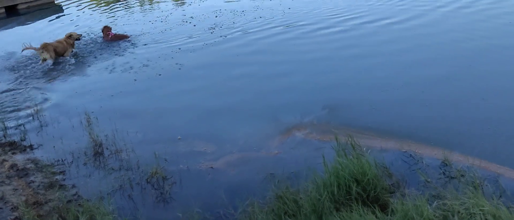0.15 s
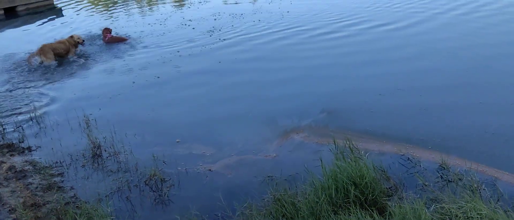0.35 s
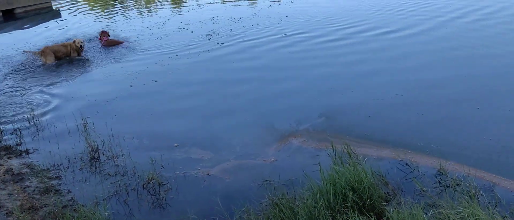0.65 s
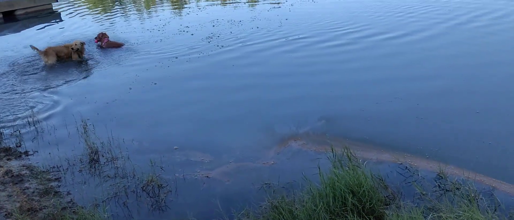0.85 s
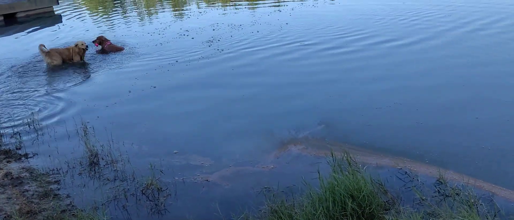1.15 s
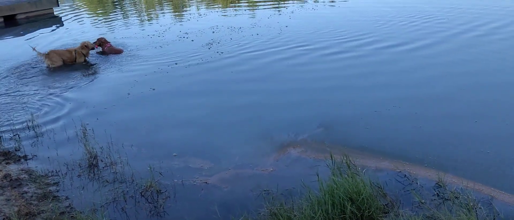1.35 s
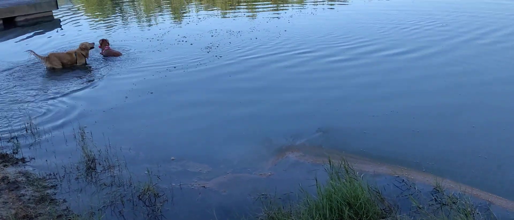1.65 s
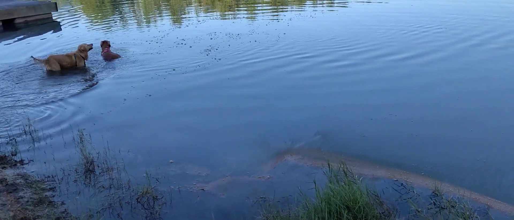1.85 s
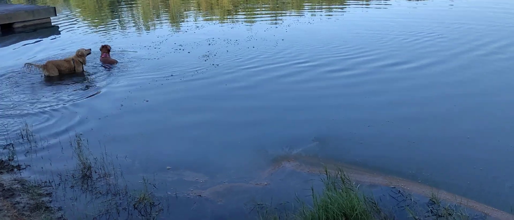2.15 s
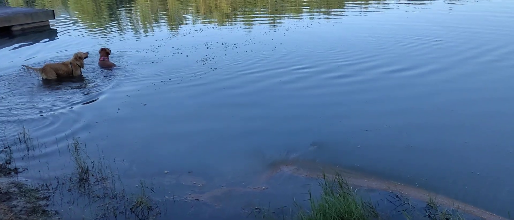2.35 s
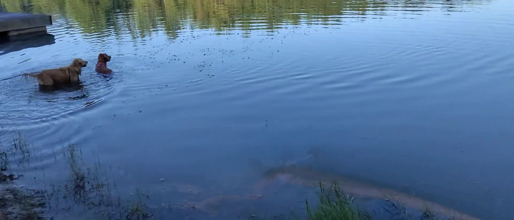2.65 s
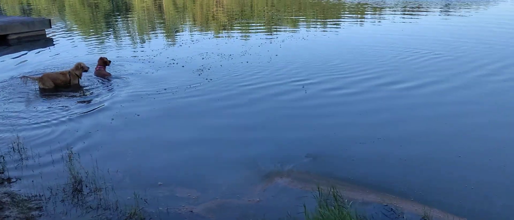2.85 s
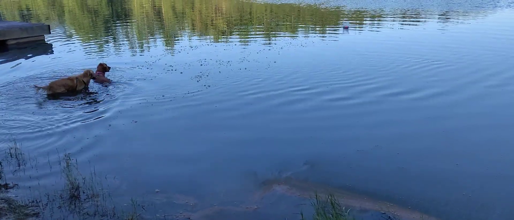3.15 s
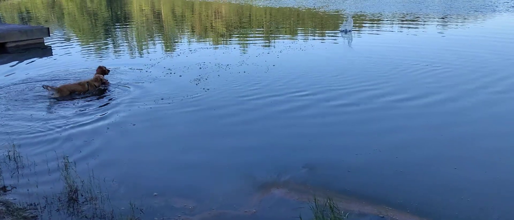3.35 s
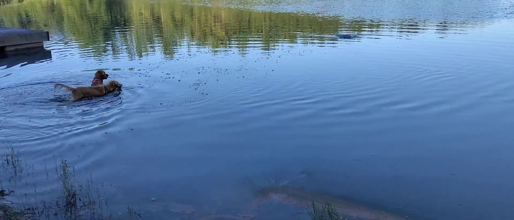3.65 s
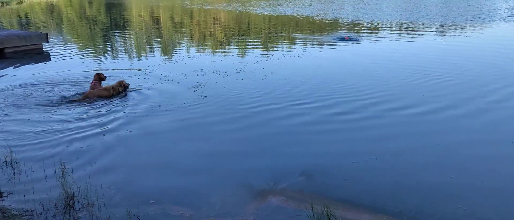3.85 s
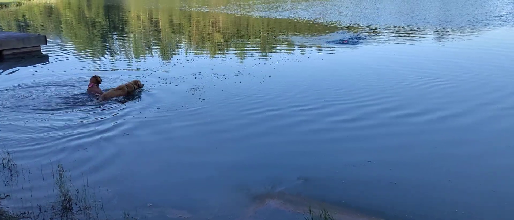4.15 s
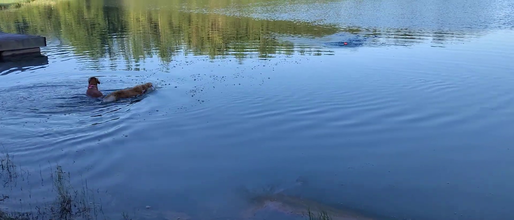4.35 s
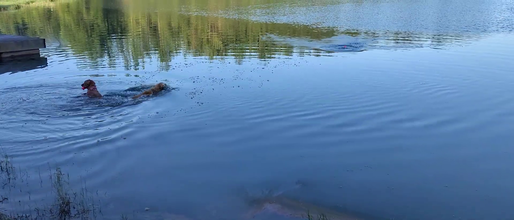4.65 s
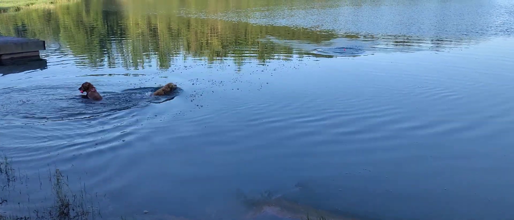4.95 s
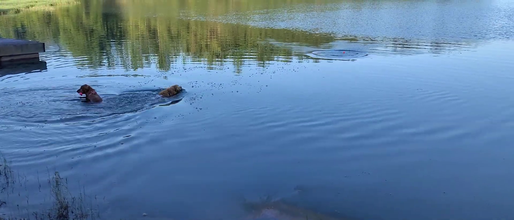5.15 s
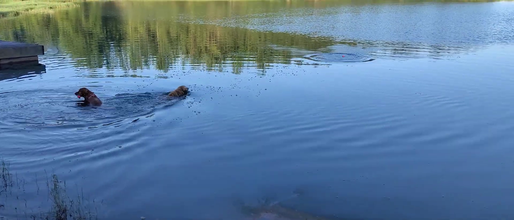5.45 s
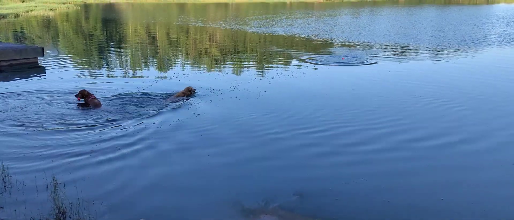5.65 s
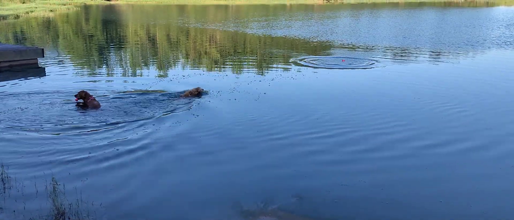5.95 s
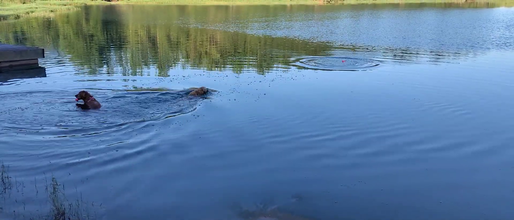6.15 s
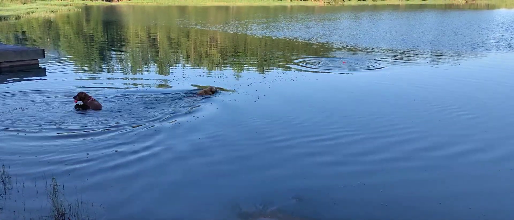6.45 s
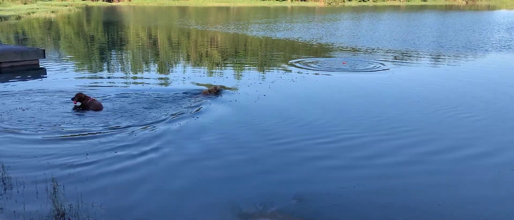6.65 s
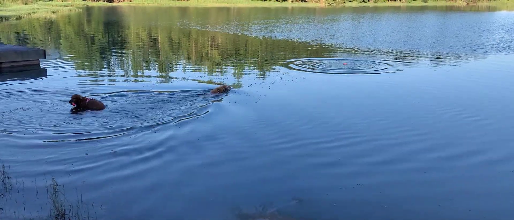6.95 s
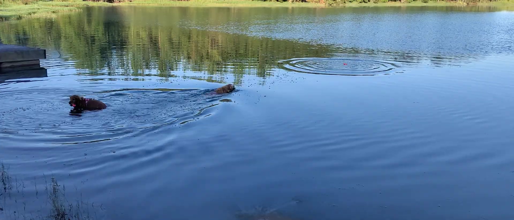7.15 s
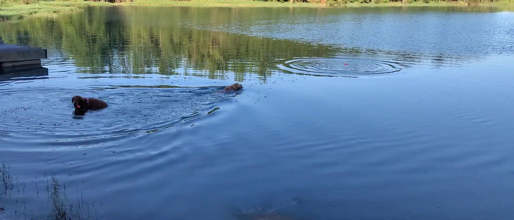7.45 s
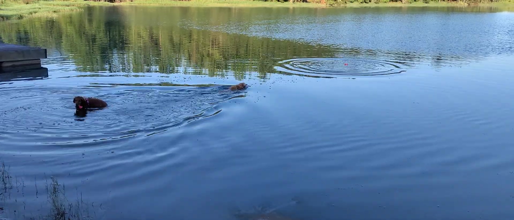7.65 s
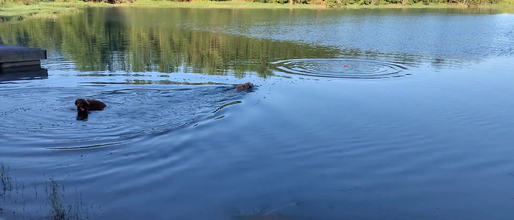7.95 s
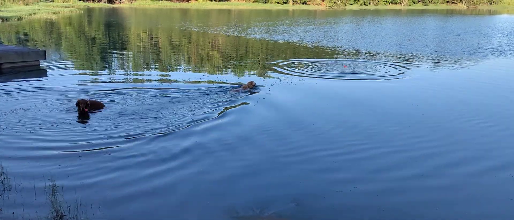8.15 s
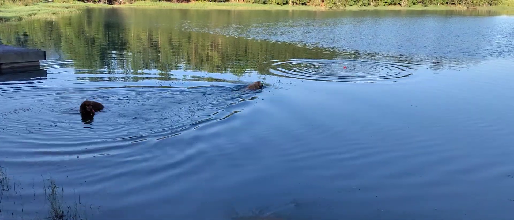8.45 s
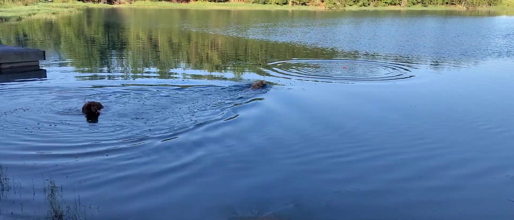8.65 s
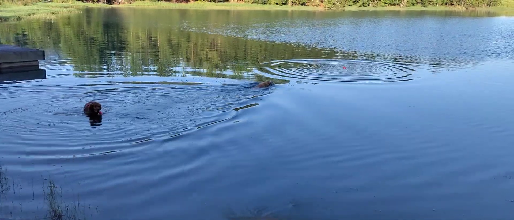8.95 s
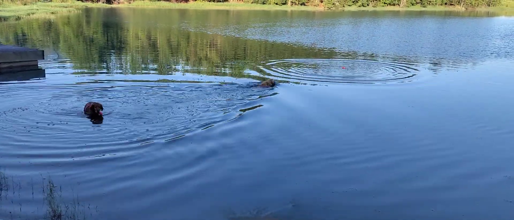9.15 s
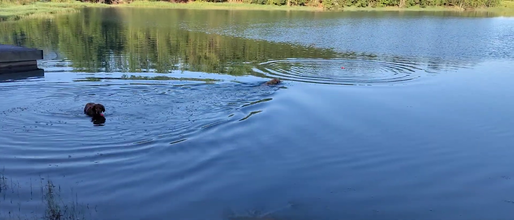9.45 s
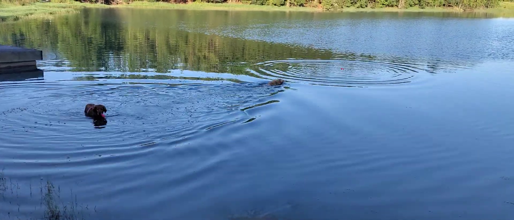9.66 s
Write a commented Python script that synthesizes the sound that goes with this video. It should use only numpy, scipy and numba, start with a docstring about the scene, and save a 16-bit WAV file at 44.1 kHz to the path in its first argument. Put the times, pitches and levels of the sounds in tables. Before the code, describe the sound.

Close wet splashing and low gurgles open the scene, thinning into scattered drips and faint ringing water tones. After a tiny falling dog whine comes a crisp slap on the water, then a second burst of churning, plops and one bright rising chirp. A bubbling snort ends the burst; later there is sparse lapping, another hissy snort and dry twig cracks. Open pond with trees, handheld stereo, light wind puffs, distant hum.

```python
"""A still pond with a wooded shore: a dog wades, then swims, metres left of a phone on the bank; a thrown toy smacks the water.
Bubbles of five sizes churn, ringing grains plop and chirp, faint random tones swell, the dog squeaks once and snorts wetly.
Stems snap as short rings with a crack; the trees smear the near sounds back as decaying noise.
Shaped noise makes puffs of wind on the microphones, throbbing insects and drones, a far hum and far air."""
import sys
import numpy as np
from scipy import signal
from scipy.fft import rfft, irfft, next_fast_len
from scipy.io import wavfile
from scipy.ndimage import uniform_filter1d
from numba import njit

SR = 44100
rng = np.random.default_rng(int(sys.argv[2]) if len(sys.argv) > 2 else 0)


def int16_out(signal):
    """Quantize to a 16-bit WAV file."""
    q = np.round(np.clip(np.atleast_2d(signal).T, -1, 1) * 32767)
    wavfile.write(sys.argv[1], SR, q.astype(np.int16))


N = 432621
T = np.arange(N) / SR
OPPOSED = np.array([[1], [-1]])  # left and right in antiphase

# Bubble sizes. Each row: lowest pitch in Hz, highest pitch in Hz, most per second, ring scale in cycles.
BUBBLE_SIZES = [(550, 1100, 340, 11), (170, 500, 100, 7), (1100, 2000, 520, 13), (2000, 6000, 1500, 18),
                (6800, 15500, 3500, 5)]


def undb(db):
    """Turn dB into an amplitude factor."""
    return 10 ** (np.asarray(db) / 20)


def level(x, db):
    """Scale to an RMS level in dB."""
    return x * undb(db) / np.sqrt(np.mean(x ** 2))


def noise():
    """White Gaussian noise."""
    return rng.standard_normal(N)


def band(x, lo_hz, hi_hz):
    """Third-order Butterworth bandpass."""
    return signal.sosfilt(signal.butter(3, [lo_hz, hi_hz], "bandpass", fs=SR, output="sos"), x)


def colour(x, table, share=1, late=None):
    """Shape a spectrum by (Hz, dB) points times share, and hold it back by (Hz, radians) points."""
    size = next_fast_len(N)
    hz = np.arange(size // 2 + 1) * SR / size
    point_hz, point_db = np.transpose(table)
    db = np.interp(np.log(hz + 1), np.log(point_hz), point_db)
    turn = np.interp(hz, *np.transpose(late)) if late else 0
    return irfft(rfft(x, size) * undb(share * db) * np.exp(-1j * turn), size)[:N]


def play(table):
    """Columns interpolated over time, and a smoothed gate that is open while the table lasts."""
    s, *columns = np.transpose(table)
    gate = (T >= s[0]) & (T <= s[-1])
    return uniform_filter1d(1. * gate, 600), [np.interp(T, s, c) for c in columns]


def pan(x, db):
    """Two ports that differ by so many dB, left minus right."""
    return x * undb([[db / 2], [-db / 2]])


def walk(rate_hz):
    """Random levels held 1 / rate_hz s and slewed twice; spread near 1."""
    k = int(SR / rate_hz)
    steps = np.repeat(rng.standard_normal(N // k + 1), k)
    return 1.3 * uniform_filter1d(uniform_filter1d(steps, k), k)[:N]


def burst(s, db, rise_s, hold_s, t60_s):
    """Summed gain of events that rise as a square, hold and fade exponentially."""
    out = np.zeros(N)
    for at, top, up, flat, fade in np.broadcast(s, db, rise_s, hold_s, t60_s):
        i = int(max(at, 0) * SR)
        t = T[:min(N - i, int((up + flat + fade) * SR))]
        attack = np.minimum(t / up, 1) ** 2
        out[i:i + len(t)] += undb(top) * attack * 1000. ** -(np.maximum(t - up - flat, 0) / fade)
    return out


@njit
def ring(length, start, hz, t60, rise, size, soft):
    """Dying sine grains that swell in over `soft` cycles and rise `rise` octaves within a third of their t60."""
    out = np.zeros(length)
    for g in range(len(start)):
        w, a, phase = 2 * np.pi * hz[g] / SR, size[g], 0.
        n = int(t60[g] * SR)
        fade, glide = 1000 ** (-1 / n), 2 ** (3 * rise[g] / n)
        for i in range(int(start[g]), min(int(start[g]) + n, length)):
            out[i] += a * np.sin(phase) * (1 - np.exp(-phase / (2 * np.pi * soft)))
            phase, a, w = phase + w, a * fade, min(w * glide, 2.8)  # w stays below Nyquist
    return out


def bubbles(lo_hz, hi_hz, per_s, cycles, busy, scatter_db):
    """A swarm of rising bubbles, a few much bigger; calm water gives fewer that ring longer."""
    biggest_db = 8  # cap over the smallest
    when, pitch, glide, big, thin = rng.random((int(per_s * N / SR), 5)).T
    hz = lo_hz * (hi_hz / lo_hz) ** pitch
    share = busy[(when * N).astype(int)]
    size = undb(np.minimum(-scatter_db * np.log(1 - big), biggest_db))
    size = size * np.clip(8 * (share - 0.872 * thin), 0, 1)
    t60_s = 2 * cycles * (0.9 + glide) / hz / share
    return ring(N, when * N, hz, t60_s, 0.284 * glide, size, 0.56)


def churn():
    """Each bubble size follows the stir and the splashes; they come in patches over a smooth rush."""
    # How hard the water is stirred. Each row: time in seconds, bubbles in dB, brightness in dB.
    stir = [(0, -43, 3), (.2, -51.5, 6.5), (.35, -44.5, 0), (.5, -45.5, 0.5), (.68, -50.5, 2),
            (.83, -60, 2.5), (1.06, -74, 12), (1.35, -67, 6), (1.9, -88, 12), (2.04, -84, 21),
            (2.09, -68, 14), (2.2, -81.5, 9), (2.5, -79.5, 8.5), (2.8, -86.5, 11), (3.25, -82.5, 8),
            (3.33, -52, 4.5), (3.5, -57.5, 2.5), (3.68, -46, 3), (3.8, -53.5, 5.5), (4.05, -47.5, 1),
            (4.22, -53.5, 4.5), (4.33, -40, -2), (4.52, -44, 2), (4.88, -48.5, 1), (5.05, -57.5, 3),
            (5.22, -59.5, 6.5), (5.27, -70.5, 4.5), (5.38, -68.5, 7), (5.9, -70, 6), (6.3, -81.5, 11),
            (6.7, -94, 14.5), (7.1, -78.5, 12.5), (7.4, -67.5, -0.5), (7.7, -87.5, 13.5), (8.1, -90, 11.5),
            (8.4, -61.5, -18), (8.72, -75, -1), (9.17, -73, -1.5), (9.35, -86, 9.5), (9.81, -82, 5)]
    # Single splashes. Each row: start in seconds, bubbles in dB, brightness in dB, fade t60 in seconds.
    splashes = [(.165, -40, -2, 0.47), (.19, -38.5, -1.5, 1), (0.388, -39, -0.5, 0.11),
                (.79, -59.5, 4, 0.39), (.87, -60, 5.5, 0.27), (1.027, -65.5, 8, 0.31),
                (2.15, -67, -10, 0.093), (2.539, -79, 17, 0.36), (3.27, -37, 9.5, 0.085),
                (3.598, -45, -22, 0.039), (3.781, -61, 10.5, 0.22), (3.905, -46, -4, 0.99),
                (4.09, -54, -5, 0.096), (4.269, -42, -6.5, 0.56), (4.434, -33, -0.5, 0.042),
                (5.034, -53.5, 2, 0.23), (5.126, -53, 0.5, 0.62), (5.361, -65, 4.5, 0.33),
                (6.12, -60, -9, 0.6), (6.398, -78, 17, 0.3), (6.541, -60, 0, 0.52), (6.87, -85, 17.5, 0.29),
                (7.07, -69.5, 6, 0.4), (7.3, -60.5, -9, 0.35), (7.86, -69, -2, 0.31),
                (8.991, -64.5, -27, 0.4)]
    # Low gurgles and rumbles, those near 5.5 s under the snort.
    # Each row: start in seconds, level in dB, hold in seconds, fade t60 in seconds.
    gurgles = [(0, -46.5, 0.021, 0.22), (0.057, -42.5, 0.14, 0.41), (0.314, -49.5, 0.11, 0.58),
               (0.514, -42, 0.099, 0.4), (2.08, -72, 0.04, 0.63), (3.269, -51.5, 0.016, 0.2),
               (4.298, -63, 0.045, 0.24), (4.446, -52.5, 0.048, 0.84), (5.429, -50, 0.03, .2),
               (5.57, -45, 0.068, 0.4), (5.7, -53, 0.074, 0.28)]
    # Each row, per bubble size: offset in dB, dB gained per dB of brightness, smooth rush in dB, port spread in dB.
    size_mix = [(-0.5, 0, -6.5, -18), (0, 0, -9, -17.5), (-2.5, 0.68, -17.5, -9), (-10, 1.5, -6, -4.5),
                (-12.5, 1.72, -3, -2)]
    # Water spectrum, rippled by the bounce off the pond. Each row: frequency in Hz, shape in dB.
    water_shape = [(150, -17), (360, -16.5), (490, -9.5), (810, 10.5), (1110, -2.5), (1450, 3), (1850, 2),
                   (2030, -14), (2150, -17.5), (2330, -11.5), (2570, -13), (2900, -16), (3290, -8.5),
                   (3550, -13.5), (3780, -7.5), (4100, -12), (4380, -11.5), (4650, -12.5), (4890, -8.5),
                   (5150, -13.5), (5400, -9.5), (5800, -11.5), (6350, -31.5), (7200, -26.5), (11000, -40),
                   (15500, -36)]
    splash_rise_s, gurgle_rise_s, calm_gurgle_db, pan_db = 0.0076, 0.014, -28, -4

    _, (db, bright) = play(stir)
    s, top, shine, t60_s = np.transpose(splashes)
    gains = []
    for up, k, *_ in size_mix:
        splash = burst(s, top + up + k * shine, splash_rise_s, 0, t60_s)
        gains.append(np.hypot(undb(db + up + k * bright), splash))
    at, gurgle_db, hold_s, fade_s = np.transpose(gurgles)
    gurgle = burst(at, gurgle_db, gurgle_rise_s, hold_s, fade_s)
    gains[1] = np.hypot(gains[0] * undb(calm_gurgle_db), gurgle)  # the lowest bubbles
    ticks = spatter()
    gains[3], gains[4] = gains[3] * ticks ** 0.2, gains[4] * ticks ** 0.4

    out, patch = 0, walk(22)
    busy = np.clip(np.sqrt(gains[0] * undb(55.5)), .3, 1)
    for (lo, hi, per_s, cycles), gain, (*_, rush_db, wide_db) in zip(BUBBLE_SIZES, gains, size_mix):
        swarm = level(bubbles(lo, hi, per_s, cycles, busy, scatter_db=2.5), 0)
        rush = undb(rush_db) * level(band(noise(), lo, hi), 0)
        mix = band(colour(swarm + rush, water_shape), lo, hi) * undb(0.84 * patch + 2.3 * walk(30))
        wide = undb(wide_db) * np.roll(mix, SR // 3) * OPPOSED  # other bubbles off to either side
        out = out + level(mix + wide, 0) * gain
    return pan(0.94 * out, pan_db)


def spatter():
    """Gain that jumps as flung drops land and dies away in a moment."""
    per_s, t60_s, scatter_db = 50, .04, 2.5
    gap, big = rng.random((500, 2)).T
    s = np.cumsum(-np.log(1 - gap)) / per_s
    keep = s < T[-1]
    return level(0.5 + burst(s[keep], -scatter_db * np.log(1 - big[keep]), .002, 0.0036, t60_s), 0)


def snorts():
    """Air blown through a wet nose: the nostrils flap unevenly and bubbles burst in the blast."""
    # Each row: start in seconds, nose level in dB, rise in seconds, hold in seconds, fade t60 in seconds,
    # throat in dB re nose, brightness in dB, spray in dB re nose, high hiss in dB re nose.
    snort_rows = [(5.452, -53.5, 0.022, 0.011, 0.32, 5, 3, -2, -10),
                  (5.502, -41, 0.015, 0.065, 0.063, 3.5, 2, -15, -11.5),
                  (5.545, -53.5, 0.016, 0.013, 0.028, 2, 5, 11, -2),
                  (5.687, -51.5, 0.0046, 0.039, 0.28, 6, -6.5, -28, -32),
                  (8.083, -62, 0.047, 0.041, 0.26, -23, 17.5, -11, 2),
                  (8.162, -40.5, 0.025, 0.075, 0.32, -18.5, 0, -19, -19.5)]
    # Upper nose, then hiss. Each row: offset in dB, dB gained per dB of brightness.
    bright_mix = [(-2, 1.17), (-11, 1.5)]
    # Nose spectrum. Each row: frequency in Hz, shape in dB.
    nose_shape = [(88, -47), (150, 11), (215, -0.5), (540, -8), (800, -1), (1080, -9), (1420, -1),
                  (1950, -10), (2600, -10.5), (2980, -14), (3350, -7.5), (4500, -10.5), (6730, -24),
                  (10500, -38), (15500, -33)]
    spray_hz, pan_db = 3700, -4

    s, db, rise_s, hold_s, t60_s, throat_db, bright, spray_db, hiss_db = np.transpose(snort_rows)
    ups = [0, throat_db] + [up + k * bright for up, k in bright_mix] + [spray_db, hiss_db]
    lo, hi, per_s, cycles = BUBBLE_SIZES[3]
    split = [(lo, spray_hz, per_s / 2, cycles), (spray_hz, hi, per_s / 2, cycles)]
    sizes = BUBBLE_SIZES[:3] + split + [BUBBLE_SIZES[4]]
    out, flap = 0, undb(4.9 * walk(70))
    for (lo, hi, per_s, cycles), up in zip(sizes, ups):
        wet = level(bubbles(lo, hi, per_s, cycles, np.ones(N), scatter_db=1.0), 0)
        blast = wet + undb(-2.0) * flap * level(band(noise(), lo, hi), 0)
        gain = burst(s, db + up, rise_s, hold_s, t60_s)
        out = out + level(band(colour(blast, nose_shape), lo, hi), 0) * gain
    return pan(out, pan_db)


def plops(rows, drier_db=0):
    """One dying sine grain each; a large glide makes it swell in slowly; faint ones are wetter with echo."""
    echo_at_minus_40_db, echo_per_db = -4.5, -0.2281
    s, db, hz, t60_s, pan_db, rise = np.transpose(rows)[:, :, None]
    sounds = []
    for k in range(len(s)):
        soft_cycles = 1.5 + 60 * rise[k, 0] ** 2
        sounds.append(ring(11000, 0 * s[k], hz[k], t60_s[k], rise[k], 1.5 * undb(db[k]), soft_cycles))
    echo_db = echo_at_minus_40_db + echo_per_db * (db[:, 0] + 40) + drier_db
    return place(s[:, 0], sounds, pan_db[:, 0], echo_db)


def faint_tones():
    """Faint random tones from 650 to 3600 Hz that swell in softly and ring on, spread over both ports."""
    # Each row: time in seconds, level in dB.
    tone_levels = [(0, -70), (.9, -62.5), (1.6, -65.5), (2.6, -74), (3.3, -69), (4.5, -52.5), (5.3, -67),
                   (6.2, -71), (6.7, -74), (7.3, -76), (7.8, -73), (8.5, -71.5), (9.2, -75.5),
                   (9.81, -79.5)]
    per_s, lo_hz, hi_hz = 110, 650, 3600
    t60_scale_s, swell_cycles, tilt_db_per_octave = .1, 26., -3.5
    _, (db,) = play(tone_levels)
    layers = []
    for at, pitch, ringing, big, glide in rng.random((2, int(per_s * N / SR), 5)).transpose(0, 2, 1):
        hz = lo_hz * (hi_hz / lo_hz) ** pitch
        size = undb(-2.6 * np.log(1 - big) + tilt_db_per_octave * np.log2(hz / lo_hz))
        t60_s = t60_scale_s * (0.32 + ringing)
        layers.append(ring(N, at * N, hz, t60_s, .06 * (glide - .3), size, swell_cycles))
    mid, side = layers
    out = np.array([mid + 0.2 * side, mid - 0.3 * side]) * undb(4.4 * walk(60))
    return level(out, 0) * undb(db)


def squeak():
    """A thin falling whine of four partials over a breathy low grunt."""
    # Each row: time in seconds, pitch in Hz, partials 1 to 4 in dB.
    whine_track = [(2.02, 1025, -61, -74, -71, -72), (2.03, 1016, -53.5, -57, -51, -58),
                   (2.055, 971, -52.5, -55, -53, -55), (2.093, 933, -62.5, -56.5, -50, -65),
                   (2.106, 915, -75, -66, -77, -80)]
    # Each row: time in seconds, pitch in Hz, level in dB.
    grunt_track = [(2.04, 376, -90), (2.058, 390, -65), (2.118, 355, -67), (2.15, 360, -83)]
    gate, (hz, *dbs) = play(whine_track)
    phase = 2 * np.pi * np.cumsum(hz * (1 + 0.0055 * walk(90))) / SR
    partials = [undb(db + 3.0 * walk(120)) * np.sin((k + 1) * phase) for k, db in enumerate(dbs)]
    whine = gate * np.sqrt(2) * sum(partials)
    gate, (hz, db) = play(grunt_track)
    grunt = gate * undb(db + 4.2 * walk(41.5)) * np.sqrt(2) * np.sin(2 * np.pi * np.cumsum(hz) / SR)
    return pan(whine, -8) + undb(-4) * trees(whine) + grunt


def snaps():
    """A few cycles of a dry stem, its overtone and a short crack."""
    # Each row: start in seconds, level in dB, ring in Hz, ring t60 in seconds, left minus right in dB,
    # overtone in Hz, overtone in dB re ring, echo in dB.
    snap_rows = [(2.16, -42.5, 1960, 0.019, -12, 3800, -13, 0),
                 (2.981, -44.5, 930, 0.012, 17, 1250, -5.5, 12),
                 (6.502, -30, 1520, 0.0072, 14, 2450, 3, -2.5), (6.502, -42, 3300, .008, 5, 2960, -2, -3),
                 (7.5395, -40.5, 620, 0.0071, 12, 1090, 3, 7.5),
                 (7.5505, -37.5, 980, 0.01, 23, 1460, -12, 3), (7.5505, -40, 420, 0.0091, 25, 643, -15, -1),
                 (8.61, -40, 953, 0.0096, 16, 1386, 0, 2), (9.3888, -27, 705, 0.0055, 27, 1030, 0, 3)]
    crack_db = -9
    s, db, hz, t60_s, pan_db, over_hz, over_db, echo_db = np.transpose(snap_rows)[:, :, None]
    t = np.arange(1000) / SR
    cracks = rng.standard_normal((len(s), len(t))) * 1000 ** (-t / t60_s) * undb(db + crack_db)
    sounds = []
    for k in range(len(s)):
        stem = ring(len(t), 0 * s[k], hz[k], t60_s[k], 0 * s[k], undb(db[k]), 1.0)
        overtone = ring(len(t), 0 * s[k], over_hz[k], t60_s[k], 0 * s[k], undb(db[k] + over_db[k]), 1.0)
        lo, hi = hz[k, 0], over_hz[k, 0]
        snap = band(stem + overtone + cracks[k], 0.46 * lo, 1.8 * hi)
        sounds.append(band(snap, 0.3 * lo, 1.7 * hi))
    return place(s[:, 0], sounds, pan_db[:, 0], echo_db[:, 0])


def place(s, sounds, pan_db, echo_db):
    """Lay short sounds out in time, each with its own side and share of echo."""
    out = np.zeros((3, N + len(sounds[0])))  # left, right, echo send
    for at, x, side, echo in zip(s, sounds, pan_db, echo_db):
        i = int(at * SR)
        out[:, i:i + len(x)] += undb([[side / 2], [-side / 2], [echo]]) * x
    return out[:2, :N] + trees(out[2, :N])


def trees(x):
    """The wooded shore scatters a sound back as a short smear, different at each port."""
    t60_s, rise_s = 0.29, 0.0019
    t = np.arange(int(.35 * SR)) / SR
    back = rng.standard_normal((2, len(t))) * 1000 ** (-t / t60_s) * (1 - np.exp(-t / rise_s))
    return signal.fftconvolve(x[None], back / np.sqrt(np.sum(back ** 2) / 2), axes=1)[:, :N]


def ports(x, late=None):
    """Each port of the phone colours the pond its own way; the right may lag."""
    # Left minus right, scaled by each port's share. Each row: frequency in Hz, shape in dB.
    port_shape = [(60, 4.5), (110, -11), (200, 8), (380, 12.5), (700, 10), (1290, 8.5), (2380, -16),
                  (4400, -21), (8120, 23), (15000, -5.5)]
    left = colour(x[0], port_shape, share=0.16)
    right = colour(x[1], port_shape, share=-0.27, late=late)
    return np.array([left, right])


def wind():
    """Low rumble, partly shared by both ports: a light breeze with puffs on it."""
    # Each row: start in seconds, level in dB, hold in seconds, fade t60 in seconds, left minus right in dB.
    puff_rows = [(0, -64.5, 0.038, 0.96, 4), (0.35, -58.5, 0.043, 0.62, -4),
                 (0.496, -50.5, 0.21, 0.62, -0.5), (1.09, -68, 0.049, 0.37, 2),
                 (1.222, -51, 0.042, 0.53, -3), (1.382, -59, 0.068, 0.37, -7),
                 (3.018, -60.5, 0.024, 0.22, 0), (3.16, -52, 0.029, 0.49, -6),
                 (3.805, -39.5, 0.11, 0.25, -14), (3.969, -47.5, 0.028, 0.64, 1),
                 (4.155, -52, 0.03, 0.52, -2), (4.318, -54, 0.027, 0.25, -12), (4.45, -59, 0.18, 0.44, -3),
                 (5.524, -57.5, 0.098, 0.48, 2), (5.776, -60, 0.052, 0.95, -5),
                 (6.085, -63, 0.018, 0.17, 2), (6.517, -67, 0.23, .5, -11), (7.054, -65, 0.057, .3, -3),
                 (7.218, -57.5, 0.15, 0.16, -16), (7.706, -53.5, 0.035, 0.37, -4),
                 (8.417, -55.5, 0.022, 0.19, -6), (8.828, -61, 0.031, 0.53, -5),
                 (8.987, -65, 0.014, 0.16, 5)]
    # Rumble spectrum. Each row: frequency in Hz, shape in dB.
    rumble_shape = [(12, -66), (30, 3), (72, 14.5), (110, 11), (168, -9.5), (255, -36.5), (296, -31.5),
                    (353, -28.5), (400, -49), (520, -24.5), (880, -120)]
    rise_s, breeze_db = 0.0173, -74
    s, db, hold_s, t60_s, pan_db = np.transpose(puff_rows)
    gains = []
    for side in (1, -1):
        breeze = undb(breeze_db + 4.1 * walk(7.4))
        gains.append(np.hypot(breeze, burst(s, db + side * pan_db / 2, rise_s, hold_s, t60_s)))
    both, apart = (level(colour(noise(), rumble_shape), 0) for _ in range(2))
    return np.array(gains) * (both + 0.47 * apart * OPPOSED)


def insects_and_drones():
    """Narrow noise bands that throb apart at each port: insects and two drones that come and go."""
    # Each row: centre in Hz, width in Hz, level in dB re the insect level.
    insects = [(2995, 350, -18.5), (5044, 240, -9), (5650, 460, -11.5), (7510, 290, -6), (8550, 720, -6)]
    # Each row: time in seconds, low drone in dB, insect line in dB.
    drones = [(0, -54.5, -99), (1.06, -63, -77), (1.85, -65.5, -80.5), (2.15, -73.5, -73), (2.42, -61, -76),
              (2.65, -79, -83), (2.9, -86, -70.5), (3.3, -76, -95), (5.3, -62.5, -81), (5.65, -69, -80),
              (6, -66, -85), (6.4, -71, -71), (6.7, -102, -84.5), (7.2, -92, -76), (7.33, -92, -67.5),
              (7.5, -92, -75), (7.62, -87, -83), (7.7, -86, -77), (8.25, -68.5, -63.5), (8.45, -69, -91),
              (8.7, -71.5, -69.5), (9.05, -74.5, -97.5), (9.81, -110, -95.5)]
    # Bands of the two drones. Each row: centre in Hz, width in Hz.
    drone_bands = [(930, 128), (2880, 90)]
    # The strongest insect band. Each row: time in seconds, level in dB.
    cricket = [(0.0, -68), (0.13, -71), (0.49, -75), (0.66, -73), (1.86, -80.5), (2.05, -79.5), (2.92, -85),
               (3.28, -84), (3.44, -73), (3.79, -77), (4.18, -79), (4.51, -75), (5.85, -78.5),
               (6.42, -76.5), (7.68, -77), (8.28, -74), (8.47, -79.5), (9.29, -80.5), (9.45, -77.5),
               (9.81, -82.5)]
    # One row: centre in Hz, width in Hz.
    cricket_band = (4058, 160)
    # Left minus right of far sounds, scaled by each side's share. Each row: frequency in Hz, shape in dB.
    far_sides = [(60, 1.5), (110, -1.0), (200, -2), (380, 10), (700, -11.5), (1290, 11), (2380, -8),
                 (4400, -8), (8120, 6.5), (15000, -8.5)]
    insects_db = -74.5
    swell = [db + insects_db + 1.1 * walk(3) + 2.6 * walk(12) for _, _, db in insects]
    swell += [db + 1.9 * walk(8) for db in play(drones)[1] + play(cricket)[1]]
    bands = [row[:2] for row in insects + drone_bands + [cricket_band]]

    def one_side():
        """Every band with its own fast throb."""
        return sum(undb(db + 3.44 * walk(24)) * level(band(noise(), f - w / 2, f + w / 2), 0)
                   for (f, w), db in zip(bands, swell))

    return np.array([colour(one_side(), far_sides, share=0.53), colour(one_side(), far_sides, share=-0.62)])


def hum():
    """A far engine drone: low wavering lines of narrow noise, the same at both ports."""
    # Each row: centre in Hz, width in Hz, level in dB.
    hum_lines = [(67.7, 4.8, -67), (117.9, 2.7, -73.5), (173.3, 2.9, -81)]
    out = 0
    for hz, w, db in hum_lines:
        narrow = signal.butter(1, [hz - w / 2, hz + w / 2], "bandpass", fs=SR, output="sos")
        out = out + level(signal.sosfilt(narrow, noise()), db)
    return out


def wavering_noise():
    """Adjacent noise bands, each wavering alone, the low ones most."""
    out = 0
    for f in 25 * 1.5 ** np.arange(16):
        depth_db = np.interp(np.log(f), np.log([300, 6000]), [3.5, 1.2])
        out = out + band(noise(), f, f * 1.5) * undb(depth_db * walk(8))
    return out


def far_air():
    """Far air: wavering noise, partly shared by both ports."""
    # Each row: frequency in Hz, shape in dB.
    air_shape = [(12, -46), (20, 8.5), (59, 10), (119, -3), (144, 4.5), (175, -2), (362, -8), (581, -61),
                 (881, -13.5), (1270, -37.5), (2840, -25), (3750, -83.5), (4810, -29), (7110, -24.5),
                 (15500, -27)]
    mid, side = wavering_noise(), wavering_noise()
    return level(np.array([colour(mid + 0.3 * side, air_shape), colour(mid - 0.44 * side, air_shape)]), -69)


def scene():
    """Pond through the ports, its echo from the trees, the other near sounds and the background."""
    # Plops, drips and bright ticks, with low throaty thumps under the snort.
    # Each row: start in seconds, level in dB, pitch in Hz, ring t60 in seconds, left minus right in dB.
    plop_rows = [(.076, -16, 315, 0.02, -5), (.099, -49, 790, 0.019, -6), (.192, -37, 837, 0.089, -14),
                 (.289, -22.5, 740, 0.022, -4), (.395, -36.5, 5730, 0.016, -10),
                 (.393, -21, 724, 0.019, -3), (.547, -31, 337, 0.082, -8), (.649, -17, 756, 0.0076, -6),
                 (.165, -35, 2350, .012, -1), (.245, -39.5, 3420, 0.021, -5.5),
                 (.275, -33, 1350, 0.028, -5), (.318, -29, 685, 0.023, -3), (.37, -33, 743, .02, -3),
                 (.518, -35, 541, .025, -1), (.61, -36, 330, .05, -5), (.735, -45, 800, 0.017, -3),
                 (.804, -46, 527, 0.059, 5), (1.03, -33, 1910, 0.016, 0), (1.215, -57, 1396, 0.14, -3),
                 (3.952, -27, 660, 0.018, -4), (1.031, -49, 3600, 0.011, -4),
                 (1.112, -44, 12200, 0.003, -13), (1.112, -48, 8500, .003, -10),
                 (1.112, -47.5, 5400, .006, -8), (1.113, -55, 2770, .03, -3), (1.216, -55, 820, 0.087, -6),
                 (1.424, -53, 923, 0.053, 0), (1.484, -63, 2330, 0.05, -6), (2.545, -52, 840, 0.048, -1),
                 (2.548, -55, 6800, 0.031, -7), (3.24, -56, 1235, 0.17, 0.5), (3.347, -38, 1450, .02, -9),
                 (3.374, -33.5, 1460, 0.019, -3), (3.47, -41.5, 1140, 0.031, 1),
                 (3.517, -41.5, 800, 0.034, -3), (3.58, -26, 1576, 0.017, -7.5),
                 (3.639, -35, 2410, .012, -5), (3.642, -39, 790, 0.036, -6), (3.606, -33, 806, 0.036, -10),
                 (3.906, -32.5, 806, 0.027, -4), (3.698, -36.5, 2000, 0.017, -8),
                 (3.792, -37, 2500, 0.021, -2), (3.792, -34, 1910, 0.012, -5),
                 (3.816, -36.5, 3050, .015, -6), (3.864, -34, 1280, 0.016, -4),
                 (3.933, -29.5, 1290, 0.016, -4), (4.05, -35.5, 1430, 0.032, -4),
                 (4.03, -38, 2060, 0.017, -5), (4.187, -42, 654, 0.034, -5), (4.283, -39, 1530, .03, -4),
                 (4.314, -44, 9000, 0.0032, -4), (4.474, -42, 8000, .003, -4),
                 (4.474, -44, 12500, .002, -4), (4.47, -33, 1620, .015, -8), (4.507, -33, 2030, 0.014, -3),
                 (4.528, -42, 834, .02, -4), (4.64, -34, 1500, 0.022, -4), (4.685, -33, 1450, 0.025, -4),
                 (4.71, -38, 1790, .015, -7), (4.84, -44, 2520, .02, -2), (4.85, -39.5, 633, 0.029, -4),
                 (4.985, -40, 1480, .02, -4), (5.065, -41, 828, 0.03, -4), (5.056, -35, 1420, 0.022, -3),
                 (5.147, -44, 1520, 0.017, -5), (5.166, -35, 1520, 0.02, -4), (5.19, -46, 970, 0.027, -5),
                 (8.255, -43, 2710, 0.034, -13), (3.635, -48, 336, 0.041, -7),
                 (4.318, -39.5, 411, 0.091, -5), (4.465, -46, 264, 0.056, -2),
                 (4.329, -33, 720, 0.015, -13), (4.391, -24.5, 590, 0.023, -5),
                 (4.4365, -22.5, 817, 0.013, -3), (4.437, -6.5, 1390, 0.0061, -6),
                 (4.437, -33.5, 3730, 0.0085, -11), (4.597, -25, 776, 0.015, -4),
                 (4.659, -28, 860, 0.014, 5), (5.128, -34, 1356, 0.023, -4), (5.366, -46, 886, .025, -3),
                 (5.409, -40, 1475, .02, -4), (5.514, -35, 243, 0.045, -2), (5.545, -35, 203, 0.063, -4),
                 (5.573, -27, 630, 0.054, -3), (5.578, -33, 185, .06, -4), (5.597, -33, 231, .05, -4),
                 (5.612, -36, 150, 0.08, -3), (5.635, -38, 171, 0.065, -4), (5.66, -43, 220, .05, -4),
                 (5.79, -44, 230, .06, -4), (5.81, -44, 190, 0.076, -4), (5.83, -48, 210, .05, -4),
                 (5.706, -38, 716, 0.107, -5), (5.73, -45, 740, 0.055, -7), (5.535, -31, 1606, 0.061, -8),
                 (5.555, -28, 1520, 0.03, -10), (5.535, -38.5, 2590, 0.031, -5),
                 (5.782, -54.5, 3350, 0.019, -6), (5.695, -46, 1466, 0.036, -4),
                 (5.72, -48, 1963, 0.062, 1), (5.916, -48, 647, 0.07, -3), (6.132, -52, 716, 0.088, -1),
                 (6.309, -57, 2290, 0.033, -2), (6.352, -54, 7400, 0.012, 0), (6.403, -54, 7000, .008, 0),
                 (6.417, -48.5, 3470, 0.03, 2), (6.71, -62, 700, 0.047, -4), (6.875, -57, 7500, 0.011, 0),
                 (6.77, -66, 1490, .06, -3), (6.544, -53, 690, 0.076, -4), (6.81, -54.5, 665, 0.072, -4),
                 (6.869, -63.5, 1360, 0.065, 12), (7.072, -56.5, 877, 0.076, -8),
                 (7.186, -57, 3050, 0.021, -5), (7.2, -57.5, 726, 0.12, -5),
                 (7.256, -52.5, 1575, 0.041, -2), (7.289, -51, 1500, 0.059, -5),
                 (7.327, -52, 1266, 0.066, -9), (7.325, -55, 672, 0.077, -3), (7.883, -55, 714, 0.035, -5),
                 (8.016, -49, 1360, 0.038, -1), (8.18, -37.5, 324, 0.045, -6), (8.217, -35, 310, 0.091, -6),
                 (8.262, -37.5, 1210, 0.054, 12), (8.276, -32, 340, 0.038, -5),
                 (8.609, -48, 378, 0.027, 18), (8.305, -44, 1400, 0.011, -4),
                 (8.39, -40.5, 2480, 0.013, -0.5), (8.49, -58, 2230, 0.027, -2), (8.598, -52, 1500, .03, 0),
                 (8.9, -60, 1560, .05, -3), (9.03, -51, 780, .04, -4), (9.23, -66, 2050, .04, -2.5),
                 (8.51, -48.5, 754, 0.064, -5), (8.611, -44, 2220, 0.013, -2), (8.611, -55, 5630, .015, 5),
                 (8.779, -56.5, 3390, .037, 5), (8.843, -59, 3390, 0.029, -8), (8.968, -54, 3270, 0.031, 0),
                 (8.999, -41, 813, 0.037, -6), (9.226, -52, 2810, 0.026, -8), (9.52, -62, 700, .05, -3)]
    # One quick rising chirp, then faint long tones, steady or gliding slightly.
    # Each row: start in seconds, level in dB, pitch in Hz, ring t60 in seconds, left minus right in dB,
    # rise in octaves.
    chirp_and_tone_rows = [(4.089, -17, 1124, 0.034, -7, 0.48), (5.9, -66, 1470, .15, -2, 0.14),
                           (6.09, -67, 1815, 0.15, -4, 0.035), (6.101, -62.5, 2495, 0.25, 2, 0.13),
                           (6.3, -72, 2376, 0.51, 9, 0.012), (6.76, -71, 1320, 0.17, -4, -0.11),
                           (6.951, -80, 1844, 0.35, -5, 0.059), (7.07, -67, 1424, 0.2, -2, 0),
                           (7.3, -67, 2650, 0.23, -4, 0.036), (7.351, -60.5, 2663, 0.21, -5, -0.12)]
    # The toy hits the water. Each row: start in seconds, level in dB, pitch in Hz, ring t60 in seconds,
    # left minus right in dB, rise in octaves.
    smack_rows = [(3.2705, -31.5, 6900, 0.0028, -7, -0.093), (3.2705, -33, 17000, .003, -7.5, -0.061),
                  (3.271, -35.5, 11000, .004, -7.5, 0.038), (3.27, -33, 3430, .01, 2.5, 0.24),
                  (3.278, -18, 2250, 0.011, -21.5, 0.34), (3.281, -31, 3880, 0.02, -13, -0.099),
                  (3.288, -23.5, 2715, 0.025, 1, -0.038), (3.288, -26.5, 1470, 0.034, -2, -0.22),
                  (3.286, -43, 300, 0.053, -6, -0.066), (3.282, -41.5, 4900, 0.012, -2.5, -0.08),
                  (3.292, -40, 3300, 0.024, -7, -0.089), (3.291, -39, 23000, 0.012, -4, 0.048),
                  (3.279, -38.5, 6000, 0.009, -5, 0), (3.28, -36.5, 10070, 0.0086, -4.5, 0),
                  (3.307, -44, 7200, .006, -6.5, 0.047)]
    # The left port hears the pond first. Each row: frequency in Hz, lag of the right port in radians.
    port_lead = [(100, 0.051), (800, 0.43), (1720, 2.01), (4220, 3.34), (10500, 21), (16000, 25)]
    # Foliage scatters treble best. Each row: frequency in Hz, shape in dB.
    leaf_shape = [(200, -5.5), (900, -6.5), (2500, 3), (9000, 1.5)]
    water_db, churn_echo_db, plop_rise_oct, smack_drier_db = -2.5, -9.5, 0.14, -7.5

    wet = undb(water_db) * (churn() + snorts() + faint_tones())
    near = wet + plops([(*row, plop_rise_oct) for row in plop_rows] + chirp_and_tone_rows)
    smack = plops(smack_rows, smack_drier_db)
    pond = ports(near, port_lead) + ports(smack)  # the toy lands straight ahead
    echo = undb(churn_echo_db) * trees(colour(wet.mean(axis=0), leaf_shape))
    return pond + echo + squeak() + snaps() + wind() + insects_and_drones() + hum() + far_air()


def record(dry):
    """The phone cuts the top above 15.6 kHz with a steep elliptic lowpass."""
    return signal.sosfilt(signal.ellip(8, .2, 70, 15600, fs=SR, output="sos"), dry)


dry = scene()
out = record(dry)
int16_out(out)
```